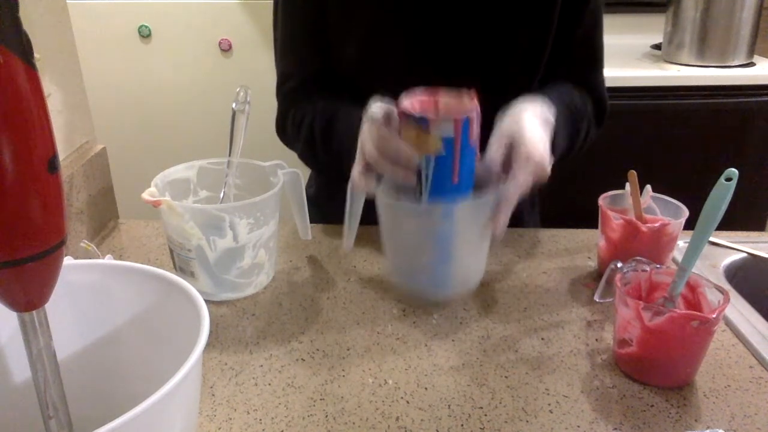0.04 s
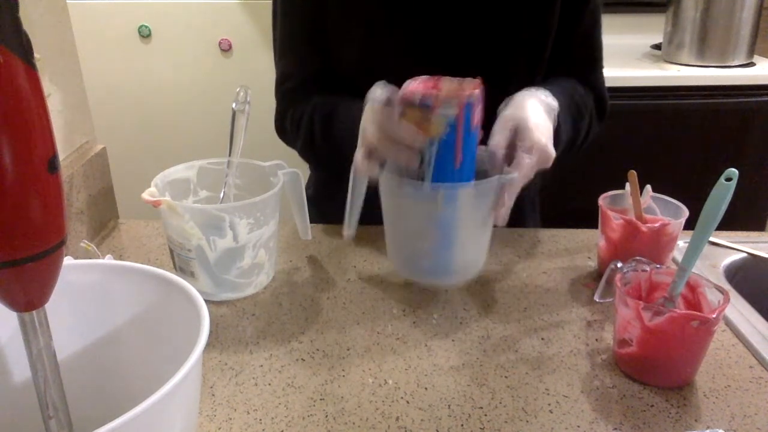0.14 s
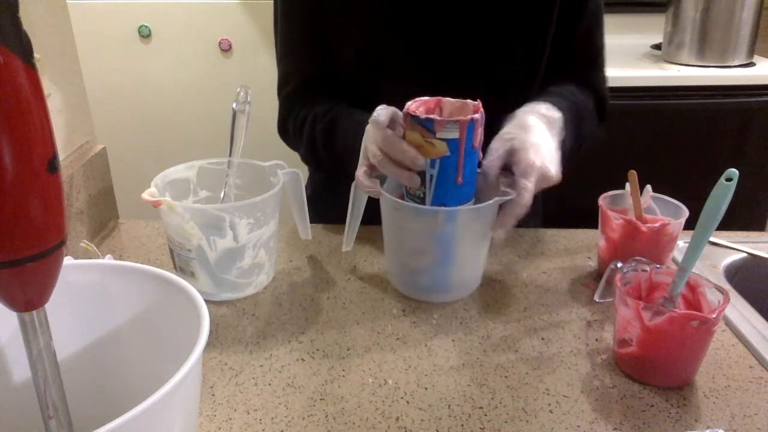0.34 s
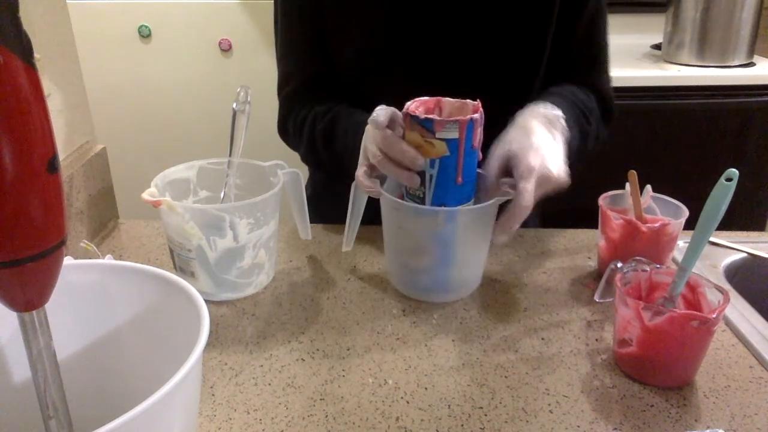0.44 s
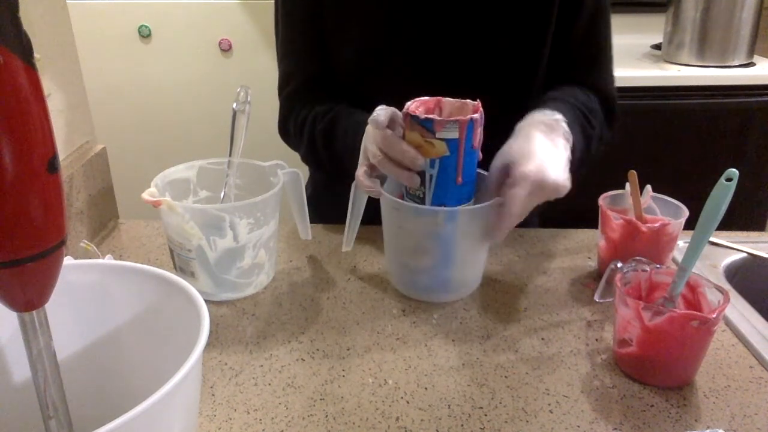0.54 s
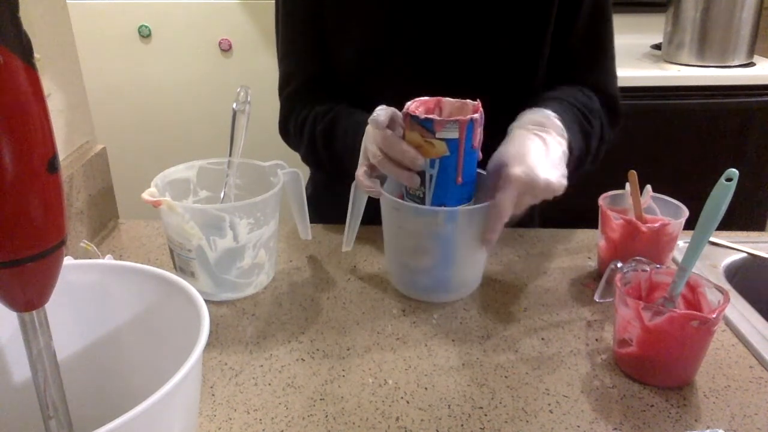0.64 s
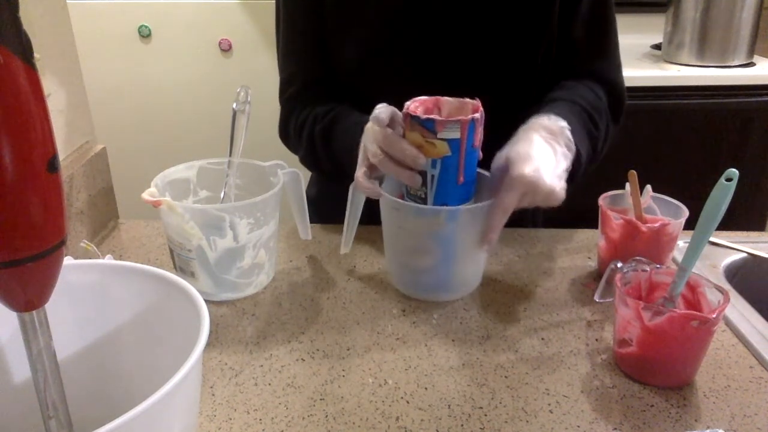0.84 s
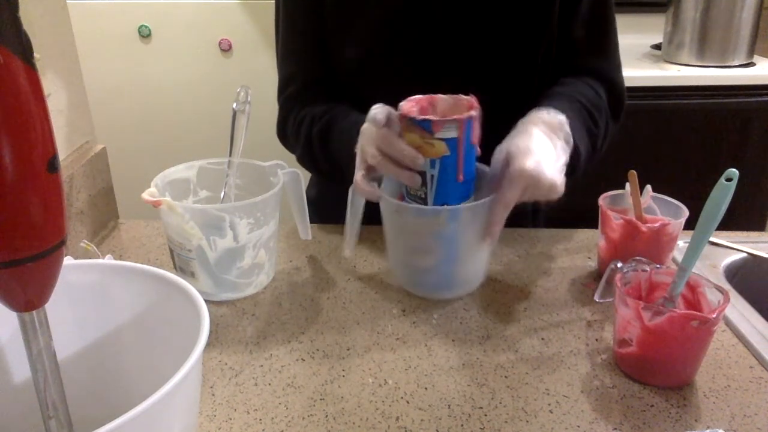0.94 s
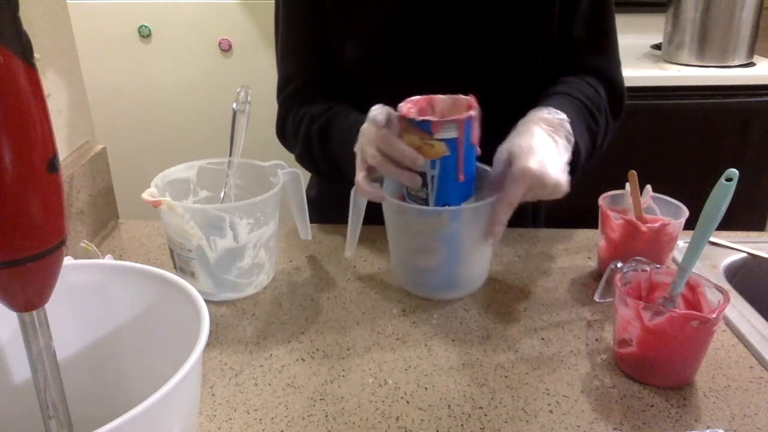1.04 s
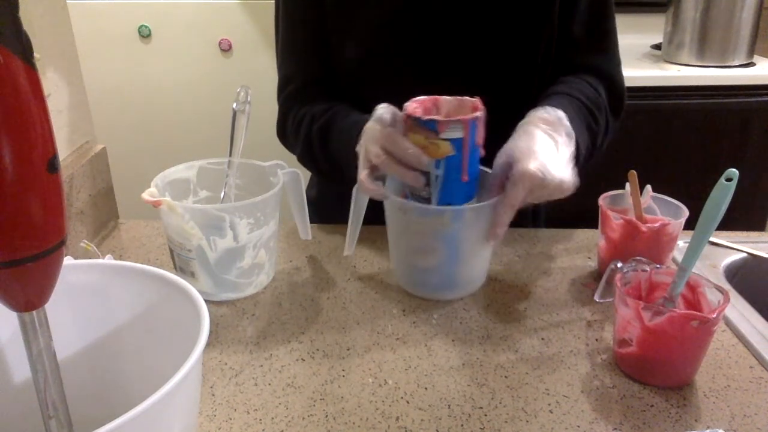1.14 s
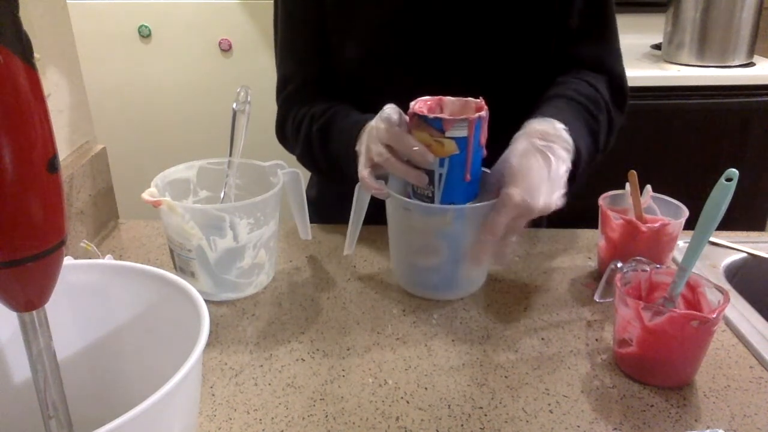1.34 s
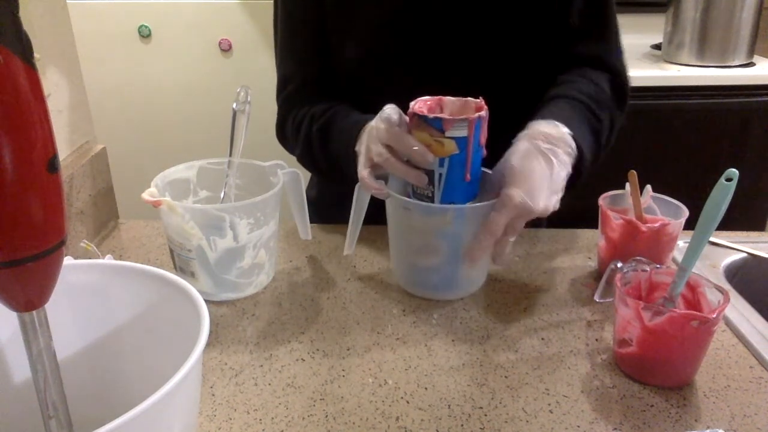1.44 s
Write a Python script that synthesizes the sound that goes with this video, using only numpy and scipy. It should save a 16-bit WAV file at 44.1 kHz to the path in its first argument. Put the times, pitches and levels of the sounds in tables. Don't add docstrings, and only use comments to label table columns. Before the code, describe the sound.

A hard knock of a filled tube in a plastic jug on a kitchen counter: an earlier blow is dying at 0 s, then at about 0.22 s a loud, hollow thud with a sharp plastic crack overloads the microphone. Its short room tail fades by about 0.6 s. Faint glove crinkles and sliding follow, with light taps around 0.9 and 1.15-1.25 s, over fridge hum and very faint, high pulsing whistles.

```python
import sys
import numpy as np
from scipy import signal
from scipy.io import wavfile
from scipy.ndimage import uniform_filter1d

SR = 44100
rng = np.random.default_rng(int(sys.argv[2]) if len(sys.argv) > 2 else 0)


def volts_from_decibels(level):
    exponent = np.asarray(level, float) / 20
    return 10 ** exponent


def to_wav(sig):
    pcm = np.clip(np.atleast_2d(sig), -1, 1) * 32767
    pcm = np.round(pcm).astype(np.int16)
    wavfile.write(sys.argv[1], SR, pcm.T)


N = 66150

# f/Hz, level/dB
AIR_COLOUR = [(24, -61), (40, -30.5), (106, -4), (194, -18), (276, -3.5), (412, -14.5), (542, -12.5),
              (3220, -15), (16000, -29)]


def rms_one(x):
    return x / np.sqrt(np.mean(x ** 2) + 1e-20)


def at_hz(points, hz):
    table_hz, values = np.transpose(points)
    return np.interp(np.log(hz), np.log(table_hz), values)


def bell(hz, centre_hz, octaves):
    return -6 * (np.log2(hz / centre_hz) / octaves) ** 2


def drift(rate_hz):
    lead = 8820
    r = np.exp(-2 * np.pi * rate_hz / SR)
    wander = signal.lfilter([1], [1, -2 * r, r * r], rng.standard_normal(N + lead))
    return rms_one(wander[lead:])


def ring(clicks, hz, t60):
    r, w = volts_from_decibels(-60 / (t60 * SR)), 2 * np.pi * hz / SR
    return signal.lfilter([0, np.sin(w)], [1, -2 * r * np.cos(w), r * r], clicks + 1e-18)


def bands(gain):
    lead = 4410
    edges = 35 * 2 ** np.arange(0, 9.1, 1 / 3)
    white = rng.standard_normal((2, N + lead))
    out = np.zeros(N)
    for k, (low, high) in enumerate(zip(edges, edges[1:])):
        sos = signal.butter(2, [low, high], "band", fs=SR, output="sos")
        out += gain(np.sqrt(low * high)) * signal.sosfilt(sos, white[k % 2])[lead:]
    return out


def knocks():
    # t/s, body level/dB, excited centre f/Hz, width/octaves, swell scale
    contacts = [(-.065, 1, 202.8, 3.7, .9), (0.2185, 5.5, 421.8, 2.2, .9), (.828, -51.5, 600, .4, 0.88),
                (.905, -50, 110.3, 0.42, .6), (.955, -42.5, 114.5, 0.52, 0.43), (.962, -52.5, 660, .2, 1),
                (1.1522, -34, 450, 2.3, 0.43), (1.243, -54, 316, 0.4, 0.57), (.398, -35.5, 314.6, .4, 0.2),
                (0.435, -42, 317.4, 0.86, 0.5), (0.114, -45.5, 325, 0.19, 0.2),
                (1.192, -43.5, 820, 0.46, .9)]
    # f/Hz, level/dB, t60/s, rise/s
    body = [(76, -9.5, .2, .015), (108, -17, .12, .008), (155.4, -8.5, 0.14, 0.0097),
            (180, -15.5, .12, .02), (296, -47.5, 1.2, .1), (287.4, -13, .14, 0.0058), (316, 1, .14, .012),
            (354.8, -11.5, .14, .012), (510.3, -15.5, 0.13, 0.005), (635.5, -5, .05, .0015),
            (787, -14, .05, 0.0036), (668, -4.5, 0.067, .0015), (951.7, -13, 0.083, .001),
            (860, -15.5, 0.047, .001)]
    t, out = np.arange(N) / SR, np.zeros(N)
    for s, body_db, centre_hz, octaves, swell in contacts:
        heard = (t >= s) & (t < s + .3 + (body_db + 60) / 60)
        age = t[heard] - s
        for k, (hz, db, t60, rise) in enumerate(body):
            level = volts_from_decibels(body_db + db + bell(hz, centre_hz, octaves) - 60 * age / t60)
            swelling = 1 - np.exp(-age / (rise * swell))
            out[heard] += (-1) ** k * level * swelling * np.sin(2 * np.pi * hz * age)
    return out


def cracks():
    # t/s, level/dB, centre f/Hz, width/octaves, t60/s
    bursts = [(-.065, -8, 11600, .6, 0.14), (-.065, -18.5, 2190, 0.059, 0.31),
              (0.2174, -9, 4600, 2.6, 0.027), (0.2181, -1, 3610, 0.4, 0.016), (0.2319, 1, 3520, 0.3, 0.01),
              (.274, -40, 3970, .3, 0.022), (.957, -54.5, 2100, .35, 0.048), (.966, -53, 2733, 0.26, .08),
              (1.112, -65, 4090, .2, 0.069), (1.121, -60, 3400, .12, 0.089), (1.155, -44.5, 1740, .1, .06),
              (1.178, -55.5, 4840, .2, .04), (1.215, -60, 3730, 0.13, 0.043),
              (1.217, -51, 4870, 0.26, 0.044), (1.212, -63, 6000, 0.11, 0.18),
              (1.214, -46, 14200, .12, 0.067), (1.244, -52, 13200, .04, .05),
              (1.155, -44.5, 1040, 0.33, 0.058), (.466, -55, 13320, 0.3, .04),
              (1.112, -58, 12840, 0.29, 0.041), (1.335, -65, 13300, 0.048, .1),
              (-.065, -14.5, 338, 0.21, 0.37), (.2200, -22, 2200, .25, .08), (.48, -66, 65, .3, .3)]
    t, out = np.arange(N) / SR, np.zeros(N)
    for s, db, centre_hz, octaves, t60 in bursts:
        edges = np.clip(centre_hz * 2 ** (octaves * np.array([-1, 1])), 20, 19000)
        sos = signal.butter(3, edges, "band", fs=SR, output="sos")
        noise = rms_one(signal.sosfilt(sos, rng.standard_normal(N)))
        attack = np.clip((t - s) * centre_hz * octaves / 2, 0, 1)
        out += noise * (t >= s) * volts_from_decibels(db - 60 * np.abs(t - s) / t60) * attack
    return out


def room():
    # t/s, level/dB, dull above f/Hz, thin below f/Hz, decay scale
    tails = [
        (-.065, -11.5, 12000, 38, 1.054),
        (0.2176, -6.5, 15000, 40, 0.89),
        (1.153, -38.5, 1500, 70, 0.59),
    ]
    # f/Hz, t60/s
    decay = [(60, 0.35), (160, 0.3922), (320, 0.3553), (1100, 0.3244), (2900, 0.3118), (4200, 0.3324),
             (7000, 0.2472), (14000, 0.27)]
    # f/Hz, level/dB
    colour = [(65, -10.5), (110, -13), (320, -6.5), (680, -13.5), (1200, -22), (2300, -20.5), (4000, -21),
              (7000, -35), (14000, -29.5)]
    t = np.arange(N) / SR

    def gain(hz):
        level = np.zeros(N)
        for s, db, dull_hz, thin_hz, scale in tails:
            age = np.maximum(t - s, 0)
            dying = volts_from_decibels(db + 20.5 + at_hz(colour, hz) - 60 * age / (scale * at_hz(decay, hz)))
            onset = 1 - np.exp(-age / (.002 + 1.5 / hz))
            level += dying * onset / (1 + (hz / dull_hz) ** 4) / (1 + (thin_hz / hz) ** 4)
        gate_db = -56.5 + 20 + 8 * (hz > 6000) + at_hz(AIR_COLOUR, hz)
        return level ** 4 / (level ** 3 + volts_from_decibels(gate_db) ** 3)

    return bands(gain)


def background():
    # f/Hz, level/dB, wander/dB
    hum_partials = [(119.6, -73, 1.5), (240, -83, 3), (341, -79, 0.5), (655, -86.5, 5.5)]
    # f/Hz, level/dB
    whistles = [(11025, -80), (14926, -82)]
    period_s, phase_s, on_share, off_db = .0935, .05, .62, -12
    t = np.arange(N) / SR
    out = volts_from_decibels(-66) * rms_one(bands(lambda hz: volts_from_decibels(at_hz(AIR_COLOUR, hz))))
    for hz, db, wander_db in hum_partials:
        out += np.sqrt(2) * volts_from_decibels(db + wander_db * drift(8)) * np.sin(2 * np.pi * hz * t)
    on = uniform_filter1d(1. * ((t - phase_s) / period_s % 1 < on_share), size=300)
    pulse = volts_from_decibels(off_db * (0.5 - on))
    for hz, db in whistles:
        out += pulse * np.sqrt(2) * volts_from_decibels(db + 2.0 * drift(30)) * np.sin(2 * np.pi * hz * t)
    return out


def grains(per_s, centre_hz, octaves, cycles, spread_db):
    sizes = volts_from_decibels(spread_db * np.minimum(rng.exponential(1, N), 4)) * rng.choice([-1, 1], N)
    snaps = sizes * (rng.random(N) < per_s / SR)
    dealt = rng.integers(0, 40, N)
    pitches = np.minimum(centre_hz * 2 ** (octaves * np.linspace(-1.3, .8, num=40)), 16000)
    out = np.zeros(N)
    for k, hz in enumerate(pitches):
        t60 = cycles / hz
        ringing = ring(ring(snaps * (dealt == k), hz, t60), hz, t60 / 2)
        out += volts_from_decibels(bell(hz, centre_hz, octaves)) * rms_one(ringing)
    return rms_one(out)


def gloves():
    # t/s, crinkle level/dB, slide level/dB
    hands = [(0.3, -70, -33), (0.342, -70, -41), (0.4, -64, -52), (0.446, -71, -78.5), (0.472, -61, -59),
             (0.51, -74, -68.5), (0.61, -54.5, -62.5), (0.674, -67, -69), (0.788, -78, -74),
             (0.988, -81, -73.5), (1.058, -92, -76), (1.124, -63, -61), (1.142, -59.5, -61.5),
             (1.224, -46.5, -61.5), (1.278, -62, -65.5), (1.438, -73, -79), (1.458, -69, -77),
             (1.5, -84, -78)]
    s, crinkle_db, slide_db = np.transpose(hands)
    t = np.arange(N) / SR
    clumps_db = 3.0 * drift(40)
    crinkle = volts_from_decibels(-4.5 + clumps_db + np.interp(t, s, crinkle_db, left=-90))
    crinkle *= grains(per_s=3500, centre_hz=13600, octaves=.3, cycles=330, spread_db=4.2)
    slide = volts_from_decibels(-0.5 + np.interp(t, s, slide_db))
    slide *= grains(per_s=4000, centre_hz=3517, octaves=0.554, cycles=60, spread_db=3.5)
    return crinkle + slide * np.clip((t - 0.439) / 0.064, 0, 1)


def scene():
    return (knocks() + cracks() + room() + background() + gloves())[None]


def top_cut(x):
    return signal.sosfilt(signal.butter(12, 16360, fs=SR, output="sos"), x)


def record(dry):
    low_hz, top_hz, knee = 65, 16100, 7.0
    x = signal.sosfilt(signal.butter(4, low_hz, "high", fs=SR, output="sos"), dry)
    x = signal.sosfilt(signal.cheby2(10, 40, top_hz, fs=SR, output="sos"), x)
    mix = x / (1 + np.abs(x) ** knee) ** (1 / knee)
    return top_cut(mix)


dry = scene()
out = record(dry)
to_wav(out)
```